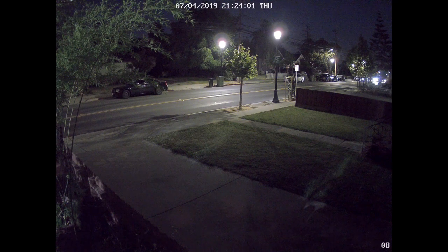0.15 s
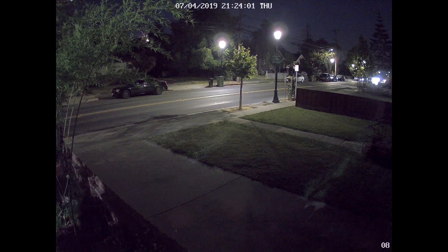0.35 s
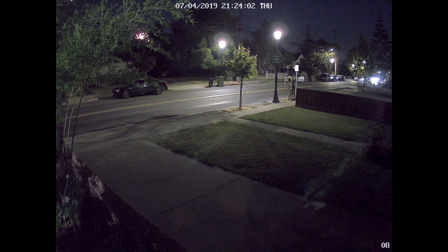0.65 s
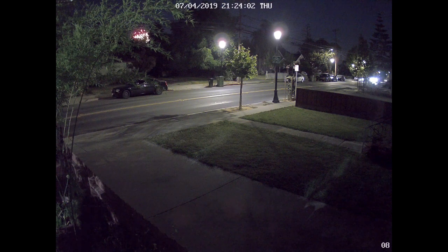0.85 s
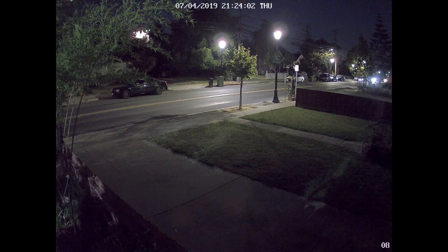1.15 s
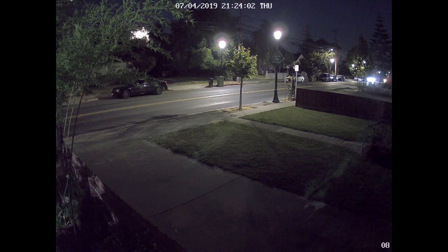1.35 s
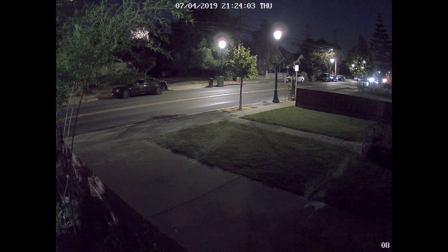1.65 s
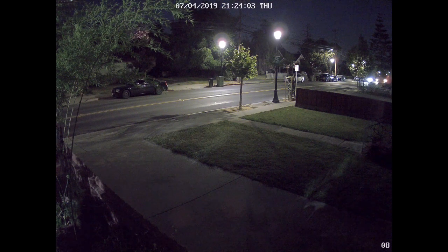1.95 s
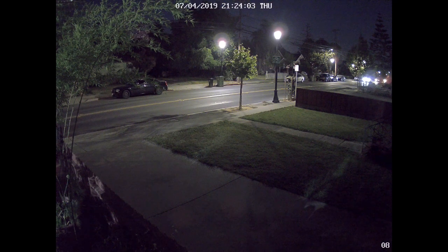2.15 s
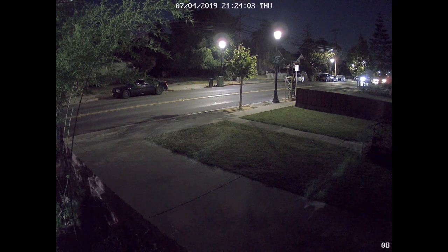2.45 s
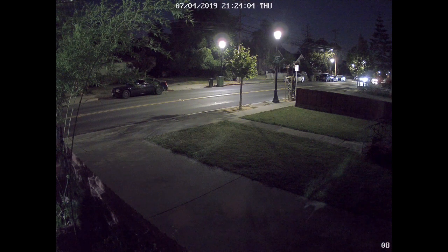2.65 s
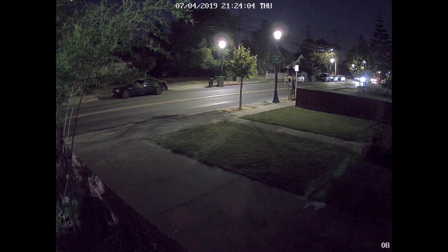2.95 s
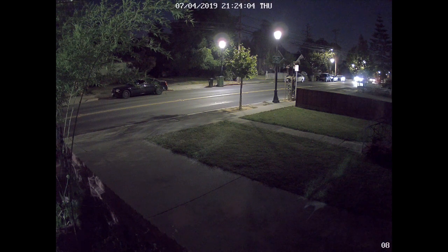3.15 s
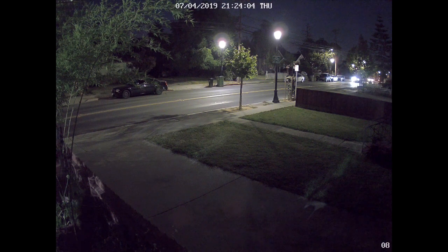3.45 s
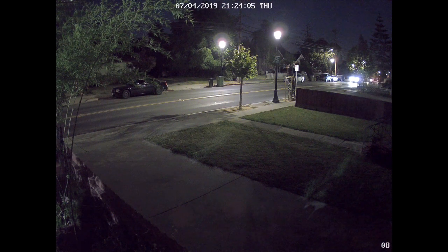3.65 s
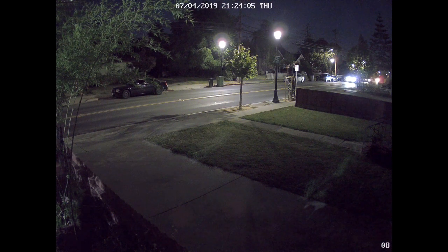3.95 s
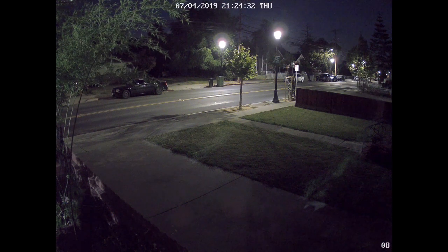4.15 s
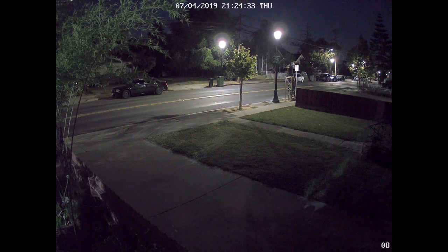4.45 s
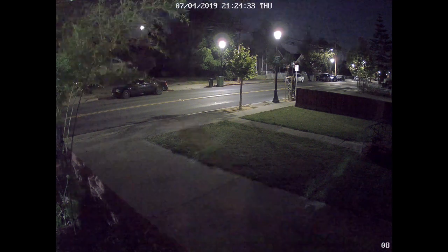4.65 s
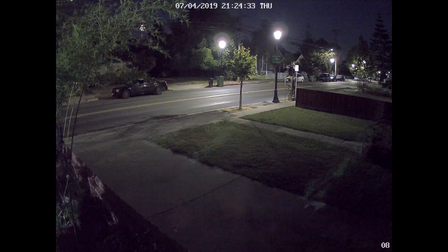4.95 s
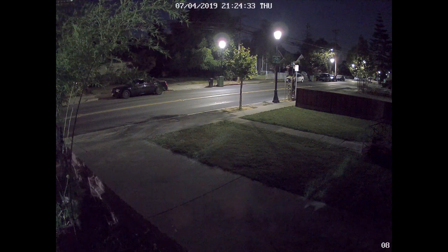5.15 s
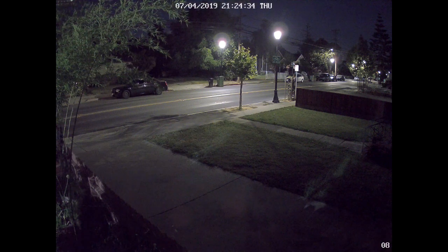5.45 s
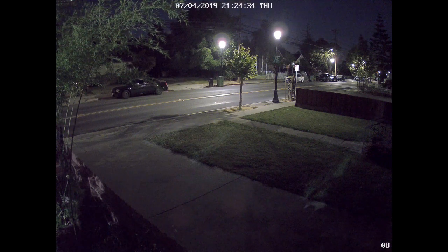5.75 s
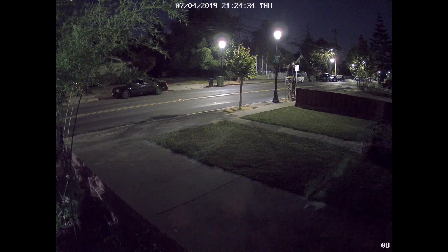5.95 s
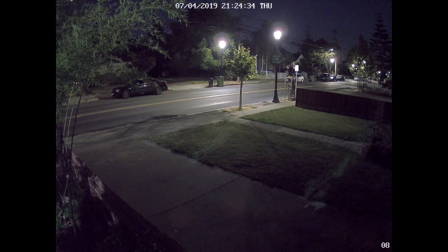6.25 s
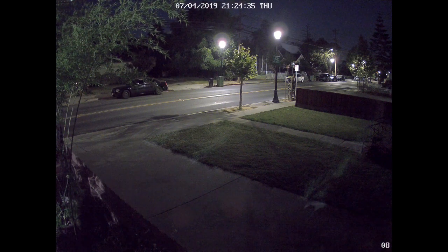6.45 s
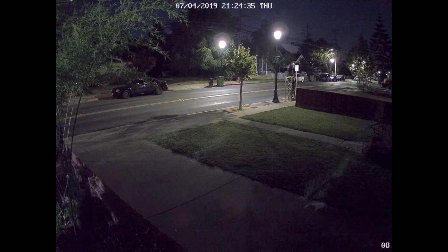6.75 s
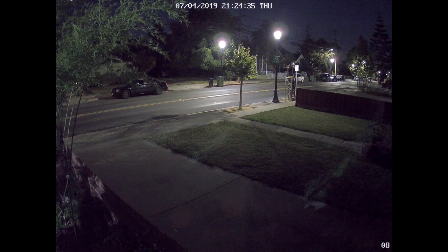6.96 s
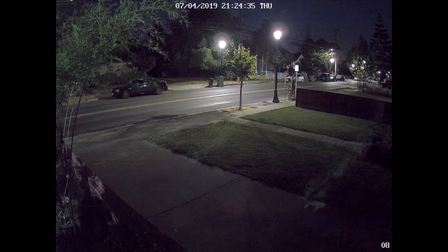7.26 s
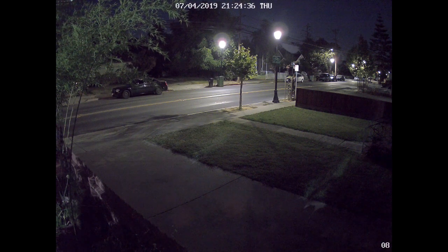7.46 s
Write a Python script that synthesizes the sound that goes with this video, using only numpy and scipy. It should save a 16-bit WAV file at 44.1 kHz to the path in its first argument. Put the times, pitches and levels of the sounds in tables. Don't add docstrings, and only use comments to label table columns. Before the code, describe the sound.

Muffled firework bangs on a night street: a quick hard volley, crackling stars, an abrupt cut, then one huge overloaded boom with rolling echoes.

```python
import sys
import numpy as np
from scipy import signal
from scipy.fft import rfft, irfft
from scipy.io import wavfile
from scipy.ndimage import uniform_filter1d

SR = 44100
rng = np.random.default_rng(int(sys.argv[2]) if len(sys.argv) > 2 else 0)


def amplitude_ratio(level_db):
    exponent = np.asarray(level_db, float) / 20
    return 10 ** exponent


def master_out(mix):
    frames = np.transpose(np.atleast_2d(mix))
    ceiling = np.clip(frames, -1, 1)
    pcm = np.round(ceiling * 32767).astype(np.int16)
    wavfile.write(sys.argv[1], SR, pcm)


N = 334719
CUT_S = 4.117


def curve(rows, column=1):
    rows = np.array(rows)
    return np.interp(np.arange(N) / SR, rows[:, 0], rows[:, column])


def coloured(x, spectrum):
    hz, level_db = np.transpose(spectrum)
    grid = np.maximum(np.fft.rfftfreq(len(x), 1 / SR), 1)
    inside = (grid >= hz[0]) & (grid <= hz[-1])
    gain = amplitude_ratio(np.interp(np.log(grid), np.log(hz), level_db)) * inside
    y = irfft(rfft(x) * gain, len(x))
    return y / np.sqrt(np.mean(y ** 2) + 1e-20)


def grains(size, per_s, spread_db):
    sizes = amplitude_ratio(spread_db * np.minimum(rng.exponential(1, size), 4))
    sizes *= rng.choice([-1, 1], size)
    x = sizes * (rng.random(size) < per_s / SR)
    return x / np.sqrt(np.mean(x ** 2) + 1e-20)


def fading(size, t60, rise_s):
    t = np.arange(size) / SR
    return amplitude_ratio(-60 * t / max(t60, .03)) * (1 - np.exp(-t / max(rise_s, .001)))


# f/Hz, level/dB per Hz
NIGHT_SPECTRUM = [(180, -32), (300, 5.5), (355, -12.5), (575, -11.5), (1290, -18.5), (1410, -18),
                  (1770, -20), (1910, -23.5), (2680, -20.5), (3840, -29), (4200, -19.5), (4390, -21.5),
                  (5710, -62), (9660, -120)]
# t/s, level/dB
NIGHT_LEVEL = [(0, -63.5), (1.7, -59.5), (3.3, -53), (4.11, -52), (4.125, -58.5), (5.7, -63.5),
               (7.59, -55.5)]
# f/Hz, rms level/dB
WHINE = [(2665, -92), (2885, -86), (3106, -86), (4134, -78)]


def night():
    t = np.arange(N) / SR
    sound = coloured(rng.standard_normal(N), NIGHT_SPECTRUM) * amplitude_ratio(curve(NIGHT_LEVEL) + 2)
    for hz, rms_db in WHINE:
        sound += np.sqrt(2) * amplitude_ratio(rms_db) * np.sin(2 * np.pi * hz * t)
    return sound


# f/Hz, level/dB per Hz
BOOM_SPECTRUM = [(32, -39), (55, 2), (124, 2.5), (220, -10), (290, -34), (480, -120)]
UPPER_SPECTRUM = [(120, -20.5), (200, 5), (400, 0.5), (700, -14), (1200, -20)]
GROUND_SPECTRUM = [(12, -22.5), (22, -8), (40, -3), (55, 0.5), (70, -19)]
# boom level/dB, upper level/dB, ground level/dB
TOWN_ROLL = (10, 4, 9.5)
# t/s, boom level/dB, t60/s, upper relative level/dB, ground relative level/dB
ROLLS = [(0.549, -33, 0.32, -1, -2), (.87, -43, 0.32, -17, 1), (1.16, -42, 1.1, 0.5, 4),
         (1.4, -36, 0.72, -3, 0), (1.793, -32.5, 1.2, -6, -11), (1.91, -37.5, 0.63, 12, -7),
         (2.112, -26.5, 1.9, -1, -12.5), (2.3, -25, 0.76, 3.5, -16), (2.4, -27.5, 1.45, 4, -5),
         (2.7, -34, 0.94, 8, 1), (2.92, -34, 1.6, -18, -2), (3.94, -31, 0.56, -10, 2),
         (4.3, -43.5, 0.69, -11, 8), (4.48, -44, 1, -10, 1), (5.04, -38.5, 0.79, -15.5, -3.5),
         (5.16, -43, 0.47, -12, 4.5), (5.33, -47.5, 0.5, -20, -16.5), (5.48, -55, .6, -1.5, 13.5),
         (5.868, -25.5, 1.3, -23, -22.5), (6.284, -12, 1.17, -25, -13), (6.4, -11.5, 0.71, -10.5, -14),
         (6.54, -17, 1.85, -9, -8), (6.93, -23, 0.57, 1, -5.5), (7.1, -28.5, 1, -4.5, -6)]


def rumble():
    power = amplitude_ratio(curve(NIGHT_LEVEL) + np.array(TOWN_ROLL)[:, None]) ** 2
    for s, boom_db, t60, upper_db, ground_db in ROLLS:
        at = round(s * SR)
        end = round(CUT_S * SR) if s < CUT_S else N
        levels = amplitude_ratio(boom_db + np.array([[0], [upper_db], [ground_db]]))
        power[:, at:end] += (levels * fading(end - at, t60, rise_s=0.019)) ** 2
    boom = coloured(grains(N, 300, 2.3), BOOM_SPECTRUM)
    upper = coloured(grains(N, 500, 3.6), UPPER_SPECTRUM)
    ground = coloured(rng.standard_normal(N), GROUND_SPECTRUM)
    return np.sum(np.sqrt(power) * [boom, upper, ground], axis=0)


# f/Hz, level/dB per Hz
WASH_SPECTRUM = [(300, -23.5), (500, 1), (800, -6.5), (1300, -7.5), (2200, -9.5), (3000, -6.5), (3700, -14),
                 (4300, -18), (6000, -35), (8000, -54)]
# front steepness/1, early clutter level/dB, swell/s, hiss t60/s, hiss hold/s,
# clutter t60/pulse cycles
SITES = dict(east=(2.45, -8, 0.06, 1.3149, 1.5, 339.5), west=(0.37, 3.2, 0.0036, 2.1, 0.33, 735),
         big=(1, -10, 0.12, 1.5, 1.5, 251.5), far=(0.54, -5.5, -0.64, 0.84, -2, 119),
         thud=(0.05, -8, -1.9, 1.2, 1.5, 75), snap=(-0.5, -7, -1.5, 3.4, 0, 288),
         back=(0.5, -8, -0.4, 0.31, 2.5, 43), thin=(0.64, -20, -3, 1.8, 1.5, 827))


def shells(table, slaps, site, bounce=(0, -99)):
    steep, early_db, rise_s, hiss_t60, hold_s, cycles = SITES[site]
    size = 2 * SR
    out = np.zeros(N + size)
    t = np.arange(size) / SR
    nearby = 1 + amplitude_ratio(early_db) * np.clip((.04 - t) / 0.013, 0, 1)
    street_end = amplitude_ratio(-11 * np.clip((t - hold_s) / 0.029, 0, 1))
    for s, peak_db, pulse_hz, clutter_db, hiss_db in table:
        turn = 2 * np.pi * np.arange(0, 1, pulse_hz / SR)
        rounded = -np.sin(turn) * np.exp(-.09 * turn)
        shock = rounded / (1 + np.clip(steep, 0, .97) * np.cos(turn))
        sharp = shock / -shock.min()

        paths = grains(size, 2500, 2.0) * fading(size, cycles / pulse_hz, 0.0046) * nearby
        paths *= amplitude_ratio(clutter_db) / np.sqrt(np.sum(rounded ** 2) * 2)
        for delay, slap_db, sign in slaps:
            paths[round(delay * SR)] += sign * amplitude_ratio(slap_db)
        burst = signal.fftconvolve(paths, rounded)[:size]

        burst[:len(shock)] += .6 * rounded + .5 * sharp
        late = round(bounce[0] * SR)
        burst[late:late + len(shock)] += amplitude_ratio(bounce[1]) * sharp

        wash = coloured(grains(size, 9000, 2.4), WASH_SPECTRUM)
        burst += amplitude_ratio(hiss_db) * wash * fading(size, hiss_t60, rise_s) * street_end

        at = round(s * SR)
        if s < CUT_S:
            burst[round(CUT_S * SR) - at:] = 0
        out[at:at + size] += amplitude_ratio(peak_db) * burst
    return out[:N]


# t/s, peak level/dB, pulse f/Hz, clutter level/dB, hiss level/dB
FAR = [(0, -41, 470, -2, -4), (.908, -43, 267, 2.5, -34), (1.1936, -26, 480, -5.5, -21),
       (1.305, -34.5, 424, 3.5, -13), (1.4388, -30, 840, -12, -19.5), (3.304, -34, 250, -6.5, -41),
       (3.566, -33, 387, 2, -18), (3.705, -50, 246, -7, -32), (4.279, -43.5, 1180, -2, -17),
       (4.3237, -24.5, 301, -10.5, -40), (4.694, -40.5, 293, -19, -33.5), (4.938, -45, 553, -2.5, -19),
       (5.777, -34, 600, -7, -20), (6.762, -27.5, 401, 4, -30), (7.36, -29.5, 1300, -5, -11)]


def far_pops():
    return shells(FAR, [], "far")


# t/s, peak level/dB, pulse f/Hz, clutter level/dB, hiss level/dB
THUDS = [
    (.5625, -29.5, 414, 2, -35.5),
    (3.827, -21.5, 290, -6.5, -33),
    (3.953, -15, 287, -6, -34),
    (4.0035, -19, 310, -3, -38),
]
# delay t/s, level/dB, sign and weight/1
FLUTTER_SLAPS = [(.0035, 0, 0.85), (.007, 10.5, 0.51), (.0105, -0.5, 1), (0.015, -4.5, 1), (.0175, 0, 0.69)]


def fluttering_thuds():
    return shells(THUDS, FLUTTER_SLAPS, "thud")


# t/s, peak level/dB, pulse f/Hz, clutter level/dB, hiss level/dB
THIN_POP = [(.1783, -23, 2400, -17, -44)]


def thin_pop():
    band = signal.butter(3, [1600, 3300], "band", fs=SR, output="sos")
    return signal.sosfilt(band, shells(THIN_POP, [], "thin"))


# t/s, peak level/dB, pulse f/Hz, clutter level/dB, hiss level/dB
SNAPS = [(2.7185, -19, 1100, -16, -30), (2.7763, -10, 1300, -16, -30), (2.8493, -12, 1500, -16, -30),
         (2.9331, -11, 1700, -16, -30), (3.1112, -21, 1900, -20, -36)]


def lone_snaps():
    return shells(SNAPS, [], "snap")


# t/s, level/dB
CRACKLE_LEVEL = [(2.42, -34.5), (2.6, -50), (2.68, -34.5), (2.8, -30.5), (2.9, -27), (3.0, -29.5),
                 (3.08, -37), (3.2, -46.5), (3.35, -56)]
# f/Hz, level/dB per Hz
CRACKLE_SPECTRUM = [(150, -15), (400, 6.5), (1000, 7.5), (2000, 4), (3100, 8), (4500, -7.5), (6000, -13)]


def crackle():
    level_db = curve(CRACKLE_LEVEL)
    full_per_s, full_db, follow = 1000, -27.5, .3
    snaps = grains(N, full_per_s * amplitude_ratio(follow * (level_db - full_db)), 3.1)
    scatter = rng.standard_normal(SR // 4) * fading(SR // 4, 0.17, 0.001) * amplitude_ratio(-29.5)
    scatter[0] = 1
    wet = signal.fftconvolve(snaps, scatter)[:N]
    t = np.arange(N) / SR
    burning = (t > CRACKLE_LEVEL[0][0]) & (t < CRACKLE_LEVEL[-1][0])
    return amplitude_ratio(level_db) * burning * coloured(wet, CRACKLE_SPECTRUM)


# t/s, peak level/dB, pulse f/Hz, clutter level/dB, hiss level/dB
WEST = [
    (5.8669, -3, 586, -20.5, -32.5),
    (6.9355, 2, 586, -24.5, -35),
]
# delay t/s, level/dB, sign/1
WEST_SLAPS = [(.0017, -9, 1), (.0033, -9, 1), (.0044, -6, -1), (.0051, -5, -1), (.0074, -9, -1),
              (.0863, -11, -1), (.0883, -14, -1), (.1634, -15, 1)]


def west_shells():
    return shells(WEST, WEST_SLAPS, "west")


# t/s, peak level/dB, pulse f/Hz, clutter level/dB, hiss level/dB
EAST = [
    (1.7918, 0.5, 460, -19, -26.5),
    (2.111, 5.5, 480, -19.5, -24.5),
    (2.2106, 5.5, 506, -19.5, -26),
    (2.2848, 7.5, 453, -25, -28),
]
# delay t/s, level/dB, sign/1
EAST_SLAPS = [(.002, -10, 1), (.0118, -13, -1), (.017, -14, -1), (.0356, -7, -1)]
# delay t/s, level/dB
EAST_BOUNCE = (.0018, -7.5)


def east_shells():
    return shells(EAST, EAST_SLAPS, "east", EAST_BOUNCE)


# t/s, peak level/dB, pulse f/Hz, clutter level/dB, hiss level/dB
BIG = [
    (6.2769, 20, 136.3, -33, -38.5),
    (6.2845, -9.5, 396, 0.5, -11),
]
# delay t/s, level/dB, sign/1
BIG_SLAPS = [(.0155, -16, 1), (.0335, -19, 1), (.101, -25, -1), (.1345, -19, -1)]
# t/s, peak level/dB, pulse f/Hz, clutter level/dB, hiss level/dB
RETURNS = [
    (6.2925, 2.5, 321, -21, -16.5),
    (6.3778, -5, 420, -20, -16.5),
    (6.4165, -6.5, 501, -19, -22),
]
# t/s, peak level/dB, pulse f/Hz, clutter level/dB, hiss level/dB
BRIGHT_BURST = [(6.2843, -10.5, 900, -8, -2.5)]


def big_shell():
    returns = shells(RETURNS, [], "back") + shells(BRIGHT_BURST, [], "back")
    return shells(BIG, BIG_SLAPS, "big") + returns


def scene():
    background = night() + rumble()
    distant = far_pops() + fluttering_thuds() + thin_pop()
    stars = lone_snaps() + crackle()
    near = west_shells() + east_shells() + big_shell()
    return (background + distant + stars + near)[None]


def low_pass(x):
    return signal.sosfilt(signal.butter(12, 15000, fs=SR, output="sos"), x)


# f/Hz, level/dB per Hz
GRIT_SPECTRUM = [(3300, -20.5), (4300, 1.5), (5500, -3), (7400, -18), (8300, -34)]
# start t/s, end t/s
DROPOUTS = [(0, .038), (.17, .23), (.55, .62), (1.13, 1.255), (1.385, 1.455), (1.78, 1.83), (2.1, 2.152),
            (3.945, 4.01), (4.3, 4.365), (5.86, 5.9), (6.21, 6.343), (6.92, 6.965)]


def record(dry):
    top = np.where(dry > 0, .74, 1.0)
    x = top * np.tanh((np.abs(dry) / top) ** 3.499) ** (1 / 3.524) * np.sign(dry)
    x = signal.sosfilt(signal.butter(1, 4, "high", fs=SR, output="sos"), x)
    band = signal.sosfilt(signal.butter(6, 3350, fs=SR, output="sos"), x)

    loudness = signal.sosfilt(signal.butter(1, 7.5, fs=SR, output="sos"), np.abs(x))
    band = band + amplitude_ratio(-16.5) * loudness ** 2.47 * coloured(rng.standard_normal(N), GRIT_SPECTRUM)

    stray = amplitude_ratio(-72.0) * rng.standard_normal(N) + amplitude_ratio(-15) * x ** 3
    above = signal.cheby2(6, 40, [3300, 8500], "band", fs=SR, output="sos")
    band = band + signal.sosfilt(above, stray)

    low = signal.sosfiltfilt(signal.ellip(10, .1, 60, 4600, fs=SR, output="sos"), band)
    t = np.arange(N) / SR
    kept = 1 - sum((t > start) & (t < end) for start, end in DROPOUTS)
    kept = uniform_filter1d(kept * 1., size=200)
    out = low + kept * (band - low) + amplitude_ratio(-101) * rng.standard_normal(N)
    out[:, round(CUT_S * SR)] += amplitude_ratio(-50)
    return low_pass(np.clip(out, -1, 1))


dry = scene()
out = record(dry)
master_out(out)
```